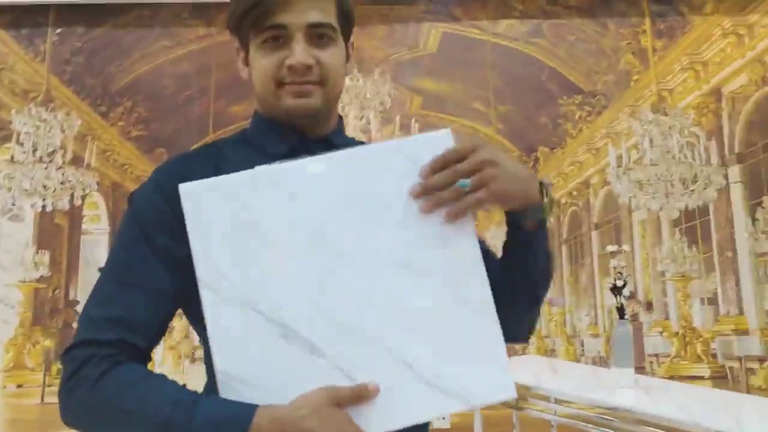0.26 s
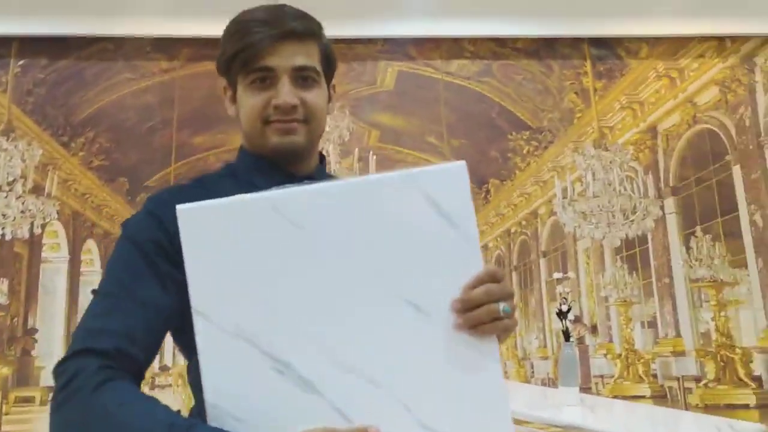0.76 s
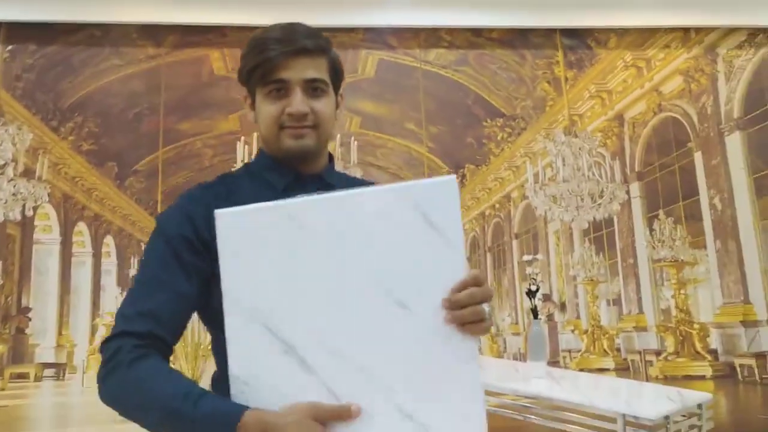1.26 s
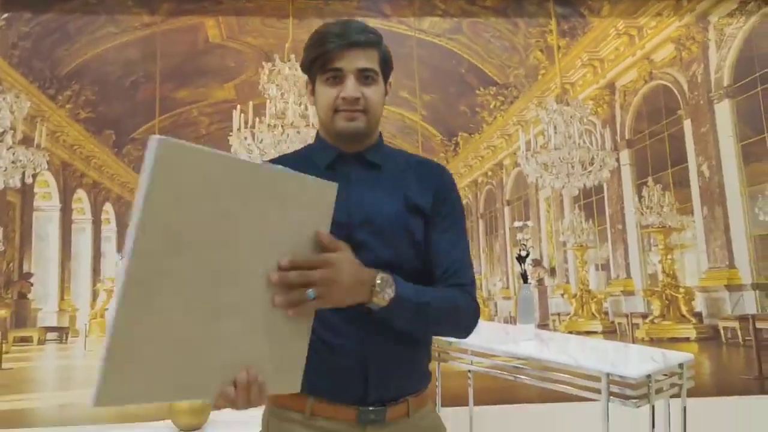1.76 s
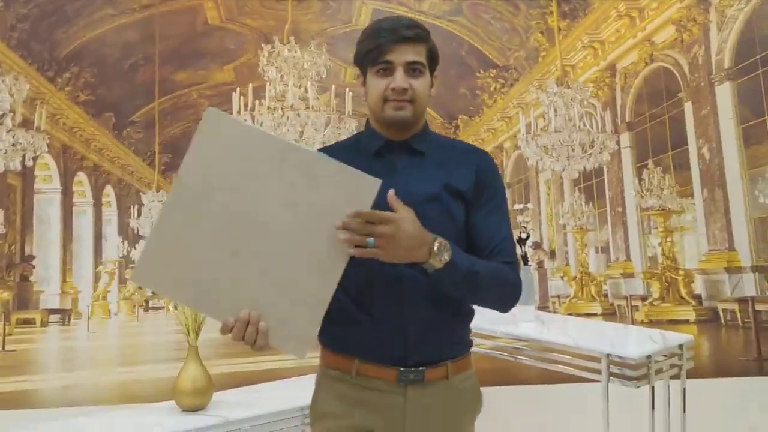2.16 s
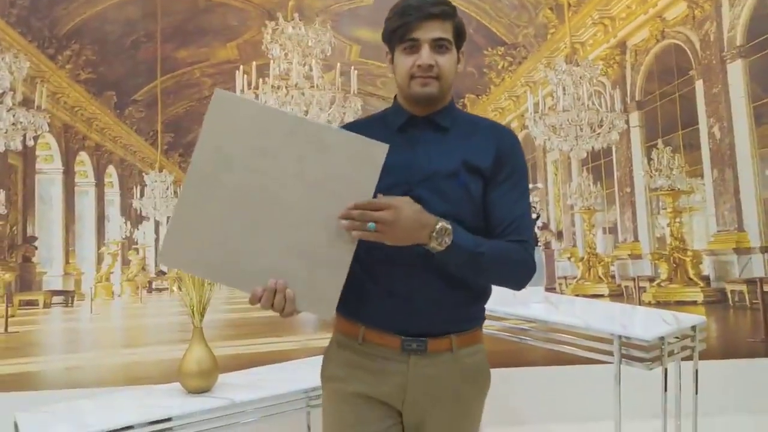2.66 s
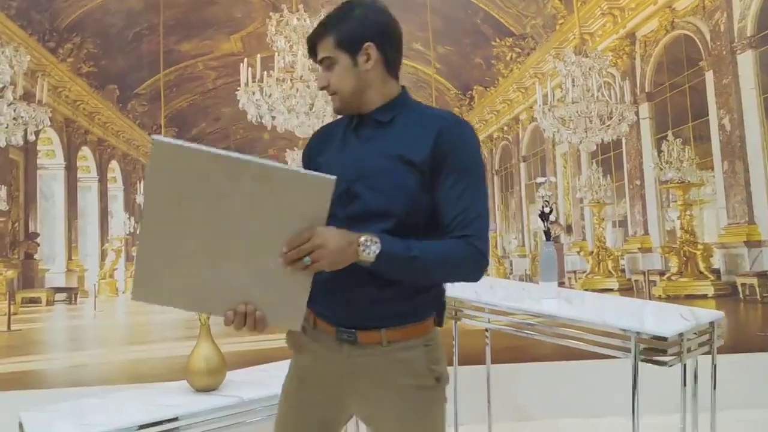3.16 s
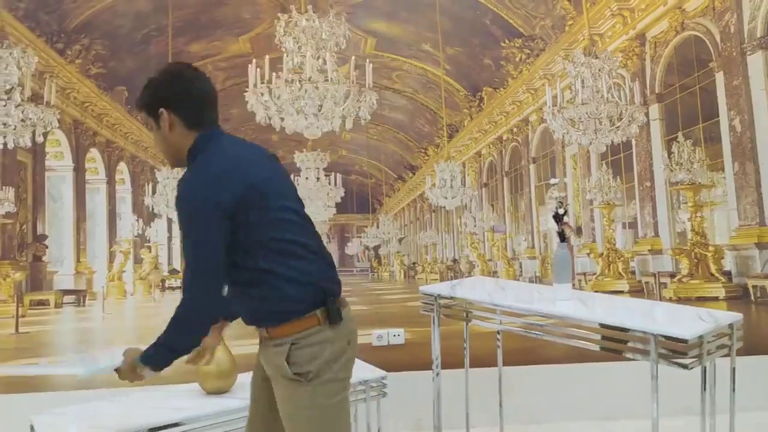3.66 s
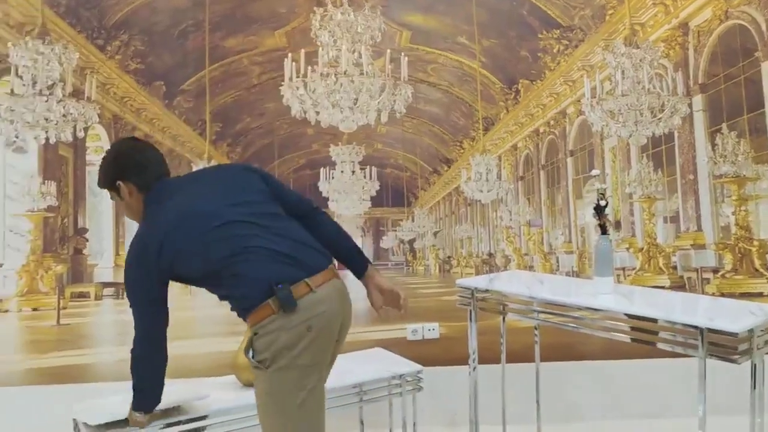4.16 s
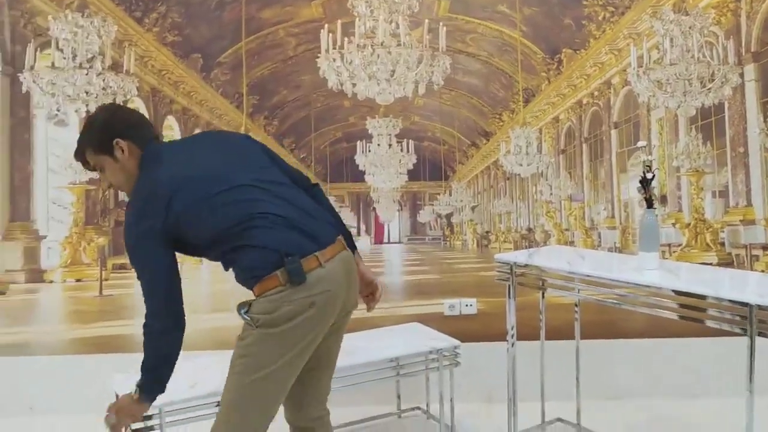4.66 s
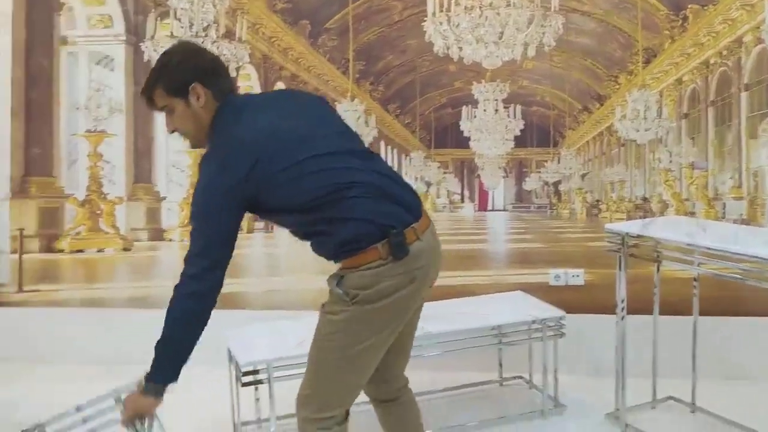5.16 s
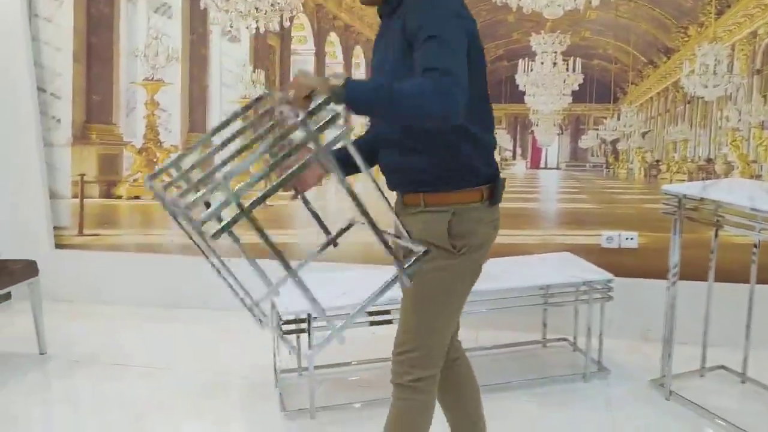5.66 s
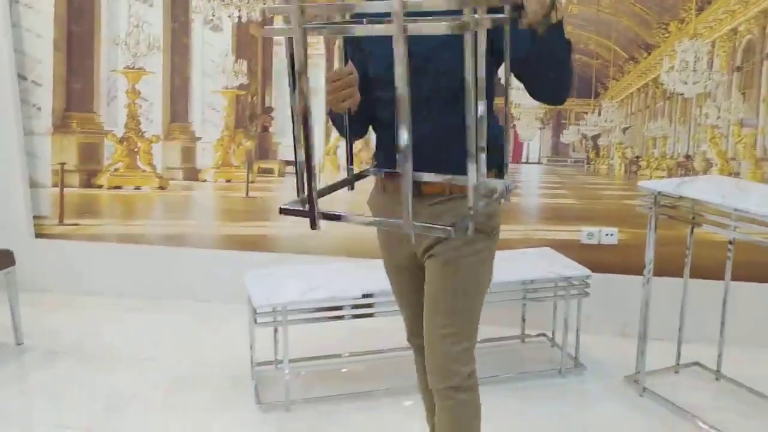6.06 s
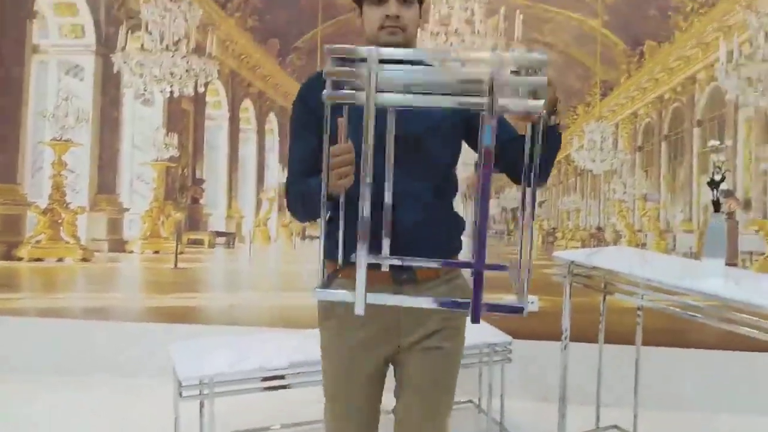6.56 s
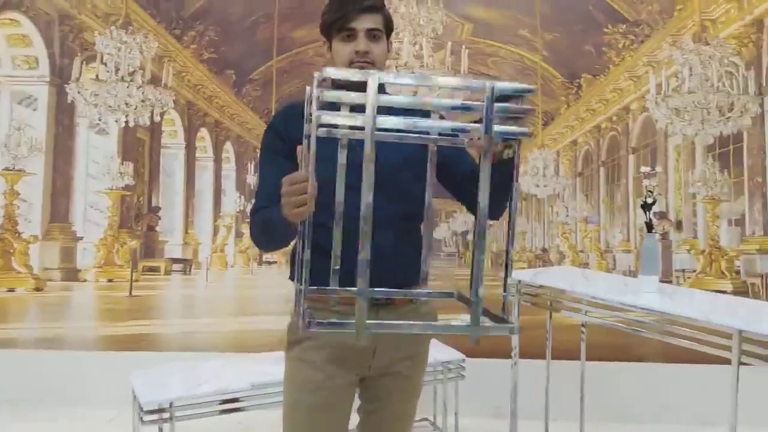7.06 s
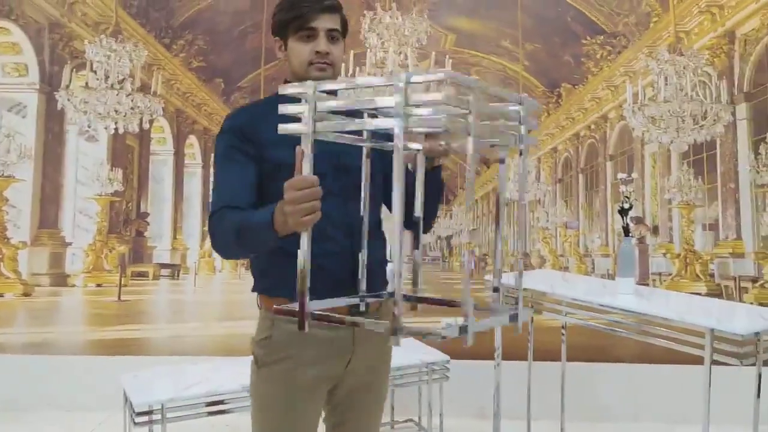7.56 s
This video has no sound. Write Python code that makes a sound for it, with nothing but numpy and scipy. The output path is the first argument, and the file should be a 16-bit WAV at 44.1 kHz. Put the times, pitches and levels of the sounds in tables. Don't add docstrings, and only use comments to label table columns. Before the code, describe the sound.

A large hard-floored showroom with about a second of bright reverberation, heard by a stereo phone a few metres away. Soft ventilation and low street rumble run throughout. From 0 to 0.5 s a hand rubs a slab faintly, followed by a barely audible fluttering fingertip squeak to 0.8. Rustle grows strongest around 1.5-1.9 as the slab turns. A faint touch at 2.2 precedes three short, damped knuckle taps at 2.5, 2.7 and 2.8. Dull footsteps fall between 3.1 and 3.95 amid cloth rustle. At 4.1-4.3 the stone lands in heavy, quick thuds with hollow bench booms, then slides and settles in gritty jerks until 4.75. At 4.94 a very fast triple steel clank rings, leaning right, followed by a grinding drag at 5.0-5.2. A slight scuff at 5.5, rustling and a faint step lead to one bright, centred clink at 6.2, echoing away into quiet rustle and air.

```python
import sys
import numpy as np
from scipy import signal
from scipy.fft import rfft, irfft, next_fast_len
from scipy.io import wavfile
from scipy.ndimage import uniform_filter1d

SR = 44100
rng = np.random.default_rng(int(sys.argv[2]) if len(sys.argv) > 2 else 0)


def waveform_to_disk(signal):
    frames = np.transpose(np.atleast_2d(signal))
    scaled = np.clip(frames, -1, 1) * 32767
    samples = np.round(scaled).astype(np.int16)
    wavfile.write(sys.argv[1], SR, samples)


def elevation(decibels):
    levels = np.asarray(decibels, float)
    return 10 ** (levels / 20)


N = 344096
PAD = next_fast_len(N)
HZ = np.fft.rfftfreq(PAD, 1 / SR)
PORT_LAG = 1
PORT_GAP_M = 0.16

# pitch_hz [Hz], density_db [dB per Hz]
AIR_COLOUR = [(12, -54.5), (20, 8), (31, -3), (48, -1.5), (91, -4), (123, -16.5), (145, -3), (211, -5),
              (255, -3), (344, -5.5), (428, -12), (476, -16), (678, -20), (2770, -27), (13000, -46.5)]
# centre_s
# [s], half_length_s [s], bass_db [dB], hum_db [dB]
SWELLS = [
    (0.148, 0.36, -4.5, -2.5),
    (3.203, 0.16, 8.5, -0.5),
    (3.7, 0.22, 2, 0.5),
    (4.273, 0.059, 15.5, -20),
    (4.503, 0.21, 11, -4),
    (5.196, 0.45, -1, 6.5),
    (6.3, 0.13, -4, 0.5),
    (7.105, 0.3, -2.5, 1.5),
    (7.5, 0.45, 2, -0.5),
]
# pitch_hz [Hz], t60_s [s]
ROOM_T60 = [(60, 0.34), (250, 0.85), (1000, 0.9), (3000, 1), (6000, 0.9), (12000, 0.14)]
# pitch_hz [Hz], level_db [dB]
MIC = [(20, -8.5), (33, -6.5), (42, 2), (2800, 1), (3300, -2.5), (3900, -3.5), (4700, -3.5), (11000, 7.5),
       (12500, -1.5), (13400, -5.5), (14200, -39.5)]
# pitch_hz [Hz], density_db [dB per Hz]
RUSTLE_COLOUR = [(410, -58.5), (700, -19.5), (1130, -2.5), (1320, -3), (2470, 2), (2890, -3.5), (4490, 0),
                 (7410, -2), (11500, -14), (12500, -16.5), (13000, -33.5)]
# start_s [s], end_s [s], level_db [dB], tilt_db towards the dull scrape [dB]
STROKES = [(0.0, 0.52, -66, -1.5), (0.89, 1.054, -75.5, 8), (1.17, 1.4, -76.5, 4.5), (1.516, 1.544, -58, 3),
           (1.588, 1.65, -52.5, 0), (1.714, 1.865, -47.5, -7.5), (1.887, 2.05, -66.5, 8),
           (2.376, 2.63, -68.5, -3), (2.67, 2.742, -69, 11), (2.807, 2.955, -71, 6.5),
           (3.103, 3.17, -70.5, -5), (3.437, 3.73, -63.5, -0.5), (3.706, 4.035, -64.5, 1.5),
           (5.476, 5.59, -68, 2), (5.71, 5.96, -62, 1), (6.097, 6.182, -70, 2.5), (6.687, 6.92, -71, 2.5),
           (7.062, 7.26, -67, -4), (7.4, 7.465, -85, -12)]

# start_s [s], peak_db [dB], left_minus_right_db [dB], contact_ms [ms]
STEPS = [
    (3.098, -41.5, -1.5, 2.8),
    (3.168, -54, -1.0, 1.9),
    (3.392, -43, -0.52, 1.8),
    (3.669, -40.5, -0.26, 1.5),
    (3.945, -45, 0.9, 1.6),
    (5.839, -56, -1.0, 2.4),
]
TAPS = [
    (2.173, -55, 2, 0.089),
    (2.4935, -29, -0.5, 0.11),
    (2.6675, -32, -0.5, 0.057),
    (2.812, -32.5, -2, 0.15),
]
THUDS = [
    (4.12, -15.5, -4, 0.15),
    (4.167, -11, -3, 0.21),
    (4.268, -8, 1.0, 0.15),
    (4.306, -16, -0.7, 0.16),
    (4.444, -24, 1.3, 0.12),
    (4.467, -28.5, 4.5, 0.1),
    (4.538, -36.5, 6.3, 0.2),
]
BOOMS = [
    (4.134, -14.5, 0.0, 0.89),
    (4.147, -15.5, 0.15, 0.28),
    (4.18, -17, -0.66, 0.28),
    (4.279, -14, -1.1, 1.0),
    (4.309, -17, -1.0, 0.41),
    (4.329, -26.5, 1.0, 1),
    (4.409, -21.5, -1.0, 1.0),
    (4.462, -16.5, -0.33, 1.0),
]
CLINK_LOW = [
    (4.9392, -11.5, 2, 0.04),
    (4.9504, -11.5, -9, 0.09),
    (4.9634, -8.5, -9.5, 0.27),
]
CLINK_HIGH = [
    (6.2122, -14.5, 0.7, 0.02),
    (6.2146, -10, 0.048, 0.014),
    (6.2200, -13, 0, .03),
]

# start_s [s], end_s [s], level_db [dB]
SLIDE = [
    (4.28, 4.45, -32.5),
    (4.462, 4.49, -28.5),
    (4.5, 4.63, -36.5),
    (4.66, 4.75, -46.5),
]
DRAG = [
    (5.015, 5.22, -28.5),
    (5.51, 5.545, -48),
]

# pitch_hz [Hz], level_db [dB]
SLAB_HELD = [(183.0, -60), (228, -56.5), (473.7, -58), (575, -58.5), (625, -56.5), (655, -83), (877.5, -75),
             (1012, -86), (2050, -78), (2363, -75)]
SLAB_LAID = [(220.7, -36), (414.5, -35.5), (511.4, -34), (613.7, -34), (678.3, -55), (818.3, -58),
             (904.4, -28.5), (985.1, -50), (1077, -46.5), (1340, -37), (1448, -66.5), (1631, -59.5),
             (1809, -35.5), (2137, -66)]
BENCH = [(222, -1), (254, 2.5), (272, 7.5), (308, -15), (420, 2.5), (630, -5.5)]
FRAME_DRAGGED = [(263.8, -56), (298, -35.5), (335, -42), (376.8, -53), (484.5, -37), (530, -56),
                 (689.1, -53.5), (764, -54.5), (829.0, -58), (1028, -70), (1060, -66), (1217, -76),
                 (1362, -70)]
LEGS_LOW = [(1857, -74), (2040, -66), (2215, -64.5), (3876, -66), (4400, -51.5), (4436, -54.5),
            (4737, -59.5), (4990, -59), (5502, -54.5), (6045, -59), (6492, -59), (6627, -64), (6837, -65)]
RAILS_LOW = [(6993, -58), (7445, -52.5), (7957, -52), (8040, -62), (8102, -50), (8269, -45), (8866, -59),
             (9275, -46), (9547, -48), (9625, -59.5), (9905, -55), (10395, -67), (10960, -67.5)]
LEGS_HIGH = [(829, -58.5), (1057, -51), (1087, -66.5), (1384, -54), (2094, -64.5), (2148, -62), (2353, -48),
             (2433, -55), (2934, -66.5), (3133, -53), (3332, -66), (4027, -52.5), (4479, -61.5)]
RAILS_HIGH = [(4963, -63.5), (5082, -55), (5164, -53), (5389, -70.5), (5669, -52.5), (5986, -49.5),
              (6261, -54.5), (6988, -50), (7230, -51.5), (7440, -50.5), (8016, -47), (8371, -56.5),
              (10045, -59), (10637, -68)]

# pitch_hz [Hz], density_db [dB per Hz]
TAP_CRACK = [(71, -28), (120, -23), (261, 2), (602, -5.5), (1080, -7), (2440, -5.5), (3750, -6.5),
             (4380, -4.5), (9710, -15), (12500, -25), (16200, -70), (22000, -120)]
THUD_CRACK = [(29, -46), (50, -44), (112, -23.5), (235, -2), (356, -13), (620, -8), (729, -10),
              (1000, -8.5), (2110, -15), (3760, -20.5), (9690, -32.5), (12900, -46.5), (16200, -96.5),
              (22000, -120)]
LOW_CRACK = [(530, -50.5), (900, -32.5), (2180, -12), (3240, -21), (3790, -20), (4870, -5), (5450, -12.5),
             (6390, -4.5), (8200, 0.5), (8680, -11), (10300, -4), (11700, -15), (13500, -32)]
HIGH_CRACK = [(290, -64), (600, -23), (821, -21.5), (1160, -22.5), (2410, -12), (2690, -28), (3220, -11.5),
              (3600, -39), (4100, -24), (4700, -7.5), (5200, -3.5), (7160, -6), (9050, -17), (10100, -16.5),
              (13500, -16.5)]
DRAG_GRIT = [(88, -43), (170, -49.5), (299, -4.5), (446, -12), (487, -18), (626, -18.5), (1050, -16.5),
             (2250, -17), (3000, -35), (3900, -55), (6600, -120)]


def curve(points, hz):
    point_hz, value = np.transpose(points)
    return np.interp(np.log(hz + 1e-9), np.log(point_hz), value)


def split(spectra, hz):
    low = 1 / (1 + (HZ / hz) ** 4)
    return irfft(spectra * low, PAD)[:, :N], irfft(spectra * (1 - low), PAD)[:, :N]


def diffuse(colour, size=PAD):
    hz = np.fft.rfftfreq(size, 1 / SR)
    alike = .95 * np.sinc(2 * hz * PORT_GAP_M / 343)
    mid, side = rfft(rng.standard_normal((2, size))) * elevation(curve(colour, hz))
    side = side * np.sqrt((1 - alike) / (1 + alike))
    rms = np.sqrt(2 * np.sum(np.abs(mid) ** 2)) / size
    return np.array([mid + side, mid - side]) / rms


def walk(rate_hz):
    hold = int(SR / rate_hz)
    steps = np.repeat(rng.standard_normal(N // hold + 1), hold)
    return 1.5 * uniform_filter1d(uniform_filter1d(steps, hold), hold)[:N]


def stroke(start_s, end_s, level_db, rise_db_s, fade_db_s, fall_db_s):
    t = np.arange(N) / SR
    rise = rise_db_s * np.maximum(start_s - t, 0)
    fade = fade_db_s * np.clip(t - start_s, 0, end_s - start_s)
    fall = fall_db_s * np.maximum(t - end_s, 0)
    return level_db - rise - fade - fall


def air():
    bass, rest = split(diffuse(AIR_COLOUR) * elevation(-54.5), hz=130)
    hum, hiss = split(rfft(rest, PAD), hz=550)
    centre_s, half_s, *swell_db = np.transpose(SWELLS)
    t = np.arange(N) / SR
    passing = np.exp(-((t - centre_s[:, None]) / half_s[:, None]) ** 2)
    bass_db, hum_db = swell_db @ passing
    bass = bass * elevation(bass_db + 1.2 * walk(2.2))
    hum = hum * elevation(hum_db + .6 * walk(2.1))
    return bass + hum + hiss * elevation(.6 * walk(1.4))


def room(build_ms=12):
    t, hz = np.arange(SR) / SR, np.fft.rfftfreq(SR, 1 / SR)
    noise = diffuse([(20, 0), (20000, 0)], size=SR)
    tail = 0
    for octave in np.arange(5, 15):
        band = np.clip(1 - np.abs(np.log2(hz + 1e-9) - octave), 0, 1)
        tail = tail + irfft(noise * band, SR) * elevation(-60 * t / curve(ROOM_T60, 2. ** octave))
    return tail * (1 - np.exp(-t * 1000 / build_ms)) / np.sqrt(np.sum(tail ** 2) / 2)


def rustle():
    dull, bright = split(diffuse(RUSTLE_COLOUR), hz=4420)
    power = np.array([elevation(2 * stroke(start_s, end_s, level_db, rise_db_s=192, fade_db_s=-1.5, fall_db_s=125))
                      for start_s, end_s, level_db, _ in STROKES])
    tilt = elevation(2 * np.array(STROKES)[:, 3])
    cloth = elevation(2 * -78.5)
    bright_gain = np.sqrt(power.sum(0) + cloth)
    dull_gain = np.sqrt(tilt @ power + cloth)
    return (bright * bright_gain + dull * dull_gain) * elevation(3.3 + 1.97 * walk(25))


def squeak():
    start_s, end_s, level_db = .55, .8, -70.5
    t = np.arange(N) / SR
    pitch_hz = 3030 - 2850 * np.clip(t - start_s - .03, 0, .3)
    flutter_db = 6 * np.sin(2 * np.pi * 15 * t)
    whistle = np.sin(2 * np.pi * np.cumsum(pitch_hz) / SR)
    return whistle * elevation(stroke(start_s, end_s, level_db, 300, 12, 200) + flutter_db)


def ring(modes, t60_1k, scatter_db=0.0, fall=0.17, split_share=0.0096):
    hz, db = np.transpose(modes)[:, :, None]
    luck = rng.standard_normal((2, len(modes), 1))
    t60 = t60_1k * (1000 / hz) ** fall
    t = np.arange(int(t60.max() * SR)) / SR
    beat = 1 + 0.25 * np.cos(2 * np.pi * split_share * hz * luck[1] * t)
    decay = elevation(db + scatter_db * luck[0] - 60 * t / t60)
    out = np.sum(decay * beat * np.sin(2 * np.pi * hz * t), 0)
    return out * np.hanning(2 * len(t))[len(t):] / np.abs(out).max()


def crack(colour, t60, even_hz=250):
    size = 8192
    gain = elevation(curve(colour, np.fft.rfftfreq(size, 1 / SR)))
    fade = elevation(-60 * np.arange(size) / SR / t60)
    burst = rfft(rng.standard_normal(size) * fade)
    burst = burst / np.sqrt(uniform_filter1d(np.abs(burst) ** 2, max(int(even_hz * size / SR), 1)))
    out = irfft(burst * gain) * np.sqrt(np.hanning(2 * size)[size:]) * (fade > elevation(-90))
    return out / np.abs(out).max()


def scrape(moves, modes, colour, ring_s, grit_db, slips_per_s, uneven_db, trim_db, fade_db_s, fall_db_s, low_hz):
    slips = (rng.random(N) < slips_per_s / SR) * elevation(uneven_db * rng.standard_normal(N))
    body = elevation(grit_db) * crack(colour, t60=0.072)
    tone = ring(modes, ring_s, scatter_db=-6.0)[:len(body)]
    body[:len(tone)] += tone
    body = signal.sosfilt(signal.butter(3, low_hz, "high", fs=SR, output="sos"), body)
    scale = np.sqrt(np.mean(slips ** 2) * np.sum(body ** 2))
    level_db = np.max([stroke(*move, 1500, fade_db_s, fall_db_s) for move in moves], 0)
    return signal.oaconvolve(slips * elevation(level_db + trim_db), body)[:N] / scale


def blows(events, modes, colour, ring_db, ring_s, crack_db, crack_s, rise_ms):
    out = np.zeros((2, N + 2 * SR))
    for start_s, peak_db, pan_db, contact_ms in events:
        push = np.exp(-np.arange(600) / (SR * max(contact_ms, .01) / 3000))
        tone = elevation(ring_db) * ring(modes, ring_s)
        snap = elevation(crack_db) * crack(colour, crack_s)
        for part in tone, snap:
            part = part * (1 - np.exp(-(np.arange(len(part)) / (SR * rise_ms / 1000)) ** 2))
            part = signal.fftconvolve(part, push / push.sum())
            for port, (lag, sign) in enumerate([(PORT_LAG, 1), (0, -1)]):
                i = int(start_s * SR) + lag
                out[port, i:i + len(part)] += part * elevation(peak_db + sign * pan_db / 2)
    return out[:, :N]


def footsteps():
    return blows(STEPS, SLAB_LAID, THUD_CRACK, ring_db=-36, ring_s=0.049,
                 crack_db=8.5, crack_s=0.11, rise_ms=1.8)


def hand_taps():
    return blows(TAPS, SLAB_HELD, TAP_CRACK, ring_db=1.5, ring_s=0.15,
                 crack_db=1.5, crack_s=0.084, rise_ms=3.6)


def slab_on_bench():
    out = blows(THUDS, SLAB_LAID, THUD_CRACK, ring_db=-4.0, ring_s=0.092,
                crack_db=-0.5, crack_s=0.077, rise_ms=0.78)
    out += blows(BOOMS, BENCH, THUD_CRACK, ring_db=5.0, ring_s=.08, crack_db=-6.5, crack_s=0.23, rise_ms=4.4)
    out += scrape(SLIDE, SLAB_LAID, THUD_CRACK, ring_s=0.028, grit_db=-2, slips_per_s=250, uneven_db=4.5,
                  trim_db=-6.0, fade_db_s=17, fall_db_s=391.5, low_hz=90)
    return out


def frame_drag():
    return scrape(DRAG, FRAME_DRAGGED, DRAG_GRIT, ring_s=0.095, grit_db=-8, slips_per_s=450, uneven_db=1.5,
                  trim_db=-9.5, fade_db_s=12, fall_db_s=133, low_hz=240)


def frame_clinks():
    out = blows(CLINK_LOW, LEGS_LOW + RAILS_LOW, LOW_CRACK, ring_db=-2.5, ring_s=0.26,
                crack_db=-1.5, crack_s=0.092, rise_ms=0.25)
    out += blows(CLINK_HIGH, LEGS_HIGH + RAILS_HIGH, HIGH_CRACK, ring_db=-6, ring_s=0.4,
                 crack_db=1, crack_s=0.045, rise_ms=0.39)
    return out


def scene():
    taps = hand_taps()
    slab = slab_on_bench() + footsteps() + frame_drag()
    steel = frame_clinks()
    send = elevation(-1.5) * taps[1] + elevation(0.5) * slab[1] + elevation(4.0) * steel[1]
    echo = signal.oaconvolve(send[None], room(), axes=1)[:, :N]
    return taps + slab + steel + echo + squeak() + rustle() + air()


def low_pass(x):
    return signal.sosfilt(signal.butter(12, 14050, fs=SR, output="sos"), x)


def record(dry):
    heard = irfft(rfft(dry, PAD) * elevation(curve(MIC, HZ)), PAD)[:, :N]
    return low_pass(heard)


dry = scene()
out = record(dry)
waveform_to_disk(out)
```